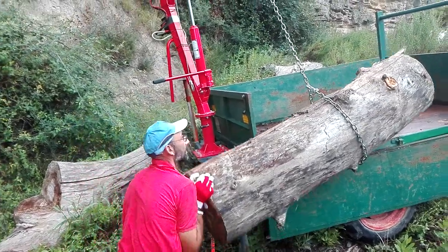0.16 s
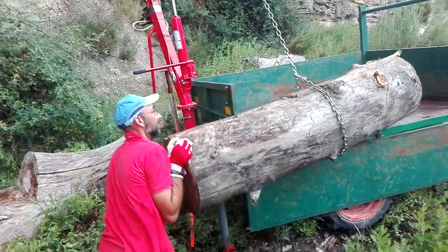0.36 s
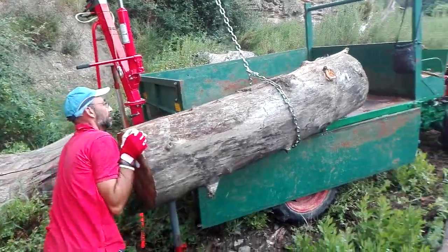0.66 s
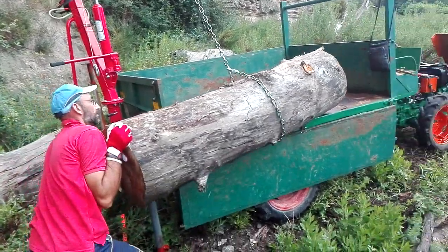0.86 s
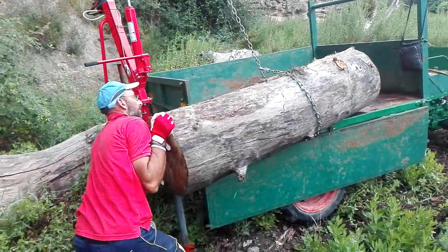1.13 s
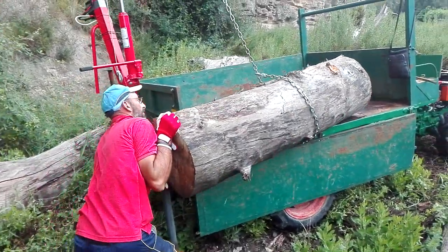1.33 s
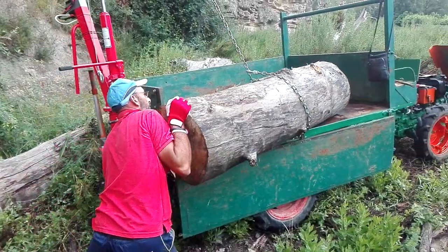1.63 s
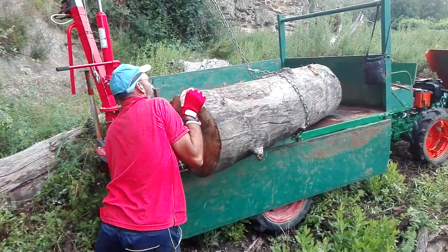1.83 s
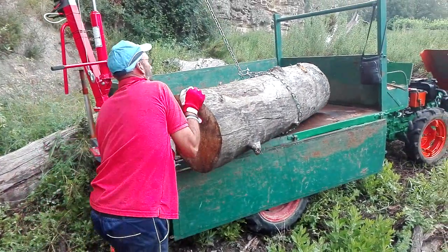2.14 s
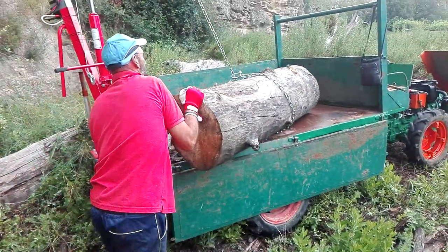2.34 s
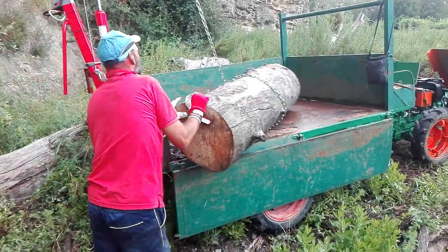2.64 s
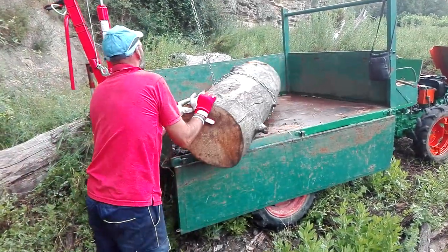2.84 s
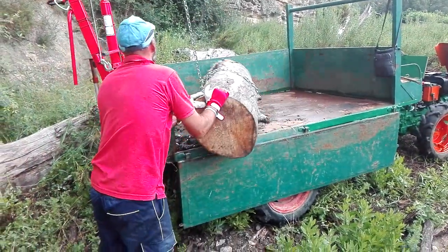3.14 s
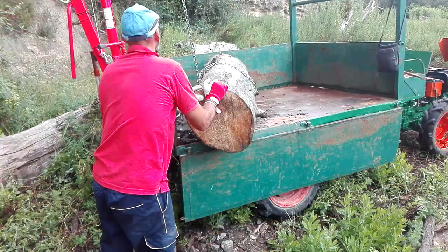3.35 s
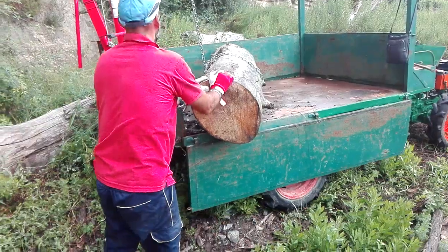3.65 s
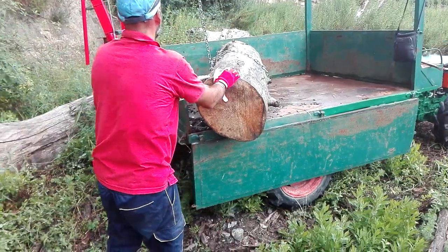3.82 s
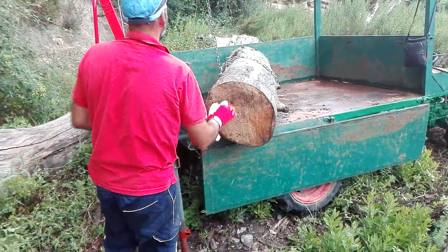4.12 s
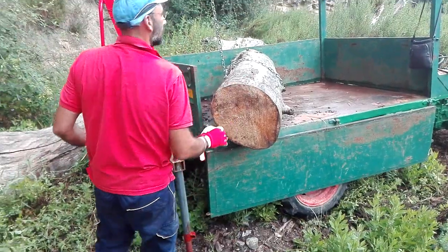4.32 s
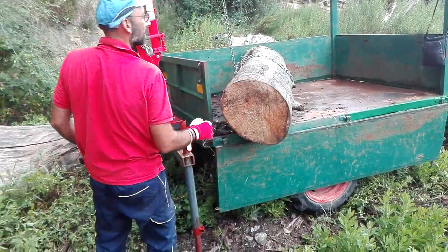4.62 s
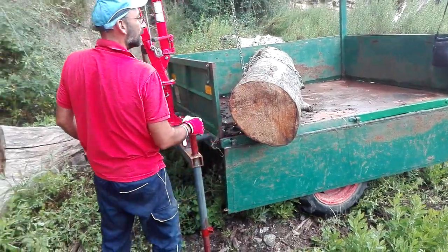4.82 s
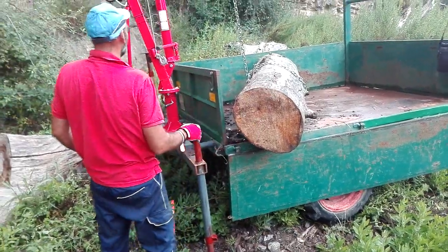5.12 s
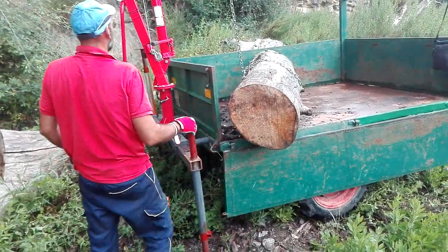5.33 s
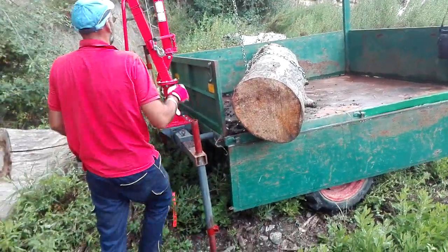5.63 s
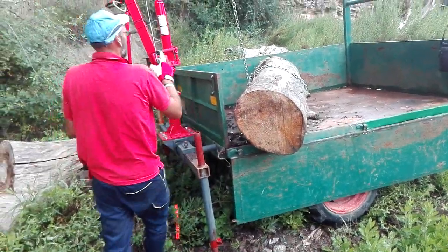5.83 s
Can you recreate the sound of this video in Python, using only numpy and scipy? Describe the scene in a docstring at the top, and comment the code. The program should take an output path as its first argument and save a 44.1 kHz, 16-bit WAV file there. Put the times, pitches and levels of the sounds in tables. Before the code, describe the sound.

Outdoors, bark grinds and judders along a metal trailer side, chain links grating, before one hard hollow steel knock and near quiet.

```python
"""Outdoors, beside a steel trailer: a log hanging from a crane chain is pushed over its side.
It rumbles, scrapes and judders along the edge while the chain shifts, rests, then drops with a loud knock,
a short rough swell just before it. Weeds rustle, twigs snap underfoot, the hoist clunks; a thin squeak.
Bodies are decaying modes and dense coloured noise, excited by bursts or streams of tiny contacts;
weeds are coloured grains, air is coloured noise, the squeak is a gliding sine with hiss."""
import sys
import numpy as np
from scipy import signal
from scipy.fft import rfft, irfft
from scipy.io import wavfile
from scipy.ndimage import uniform_filter1d

SR = 44100
rng = np.random.default_rng(int(sys.argv[2]) if len(sys.argv) > 2 else 0)


def waveform_to_disk(signal):
    """Save audio, clipped to [-1, 1], as 16-bit WAV at the path in sys.argv[1]."""
    frames = np.transpose(np.atleast_2d(signal))
    scaled = np.clip(frames, -1, 1) * 32767
    samples = np.round(scaled).astype(np.int16)
    wavfile.write(sys.argv[1], SR, samples)


N = 263277
TIME = np.arange(N) / SR


def from_db(db):
    """Decibels to amplitude gain."""
    return np.exp(np.asarray(db) * (np.log(10) / 20))


def rms_one(x):
    """Scale to unit rms."""
    return x / np.sqrt(np.mean(x ** 2) + 1e-20)


def at_hz(points, hz):
    """Interpolate a table on a log-frequency axis."""
    known_hz, values = np.transpose(points)
    return np.interp(np.log(hz + 1e-9), np.log(known_hz), values)


def coloured(x, colour):
    """Filter by a spectrum table; rms 1."""
    gain = from_db(at_hz(colour, np.fft.rfftfreq(len(x), 1 / SR)))
    return rms_one(irfft(rfft(x) * gain, len(x)))


def band(x, edges_hz):
    """Causal band-pass."""
    sos = signal.butter(4, edges_hz, "band", fs=SR, output="sos")
    return signal.sosfilt(sos, x + 1e-18)


def add(out, t_s, sound):
    """Mix a sound into out, in place, at t_s."""
    at = max(round(t_s * SR), 0)
    out[at:at + len(sound)] += sound[:max(N - at, 0)]


def drift(per_s):
    """Slow random curve, spread near 1."""
    return np.interp(TIME * per_s, np.arange(5000), rng.standard_normal(5000))


def grains(per_s, spread_db, count=N):
    """Tiny contacts at random moments, of uneven size and random sign."""
    size_db = spread_db * np.minimum(rng.exponential(1, count), 4)
    sizes = from_db(size_db) * rng.choice([-1, 1], count)
    return sizes * (rng.random(count) < per_s / SR)


def swells(rows, attack_s, fade_db_per_s):
    """Gain from rows of t/s, level/dB, hold/s: rise, hold, fade; overlaps add in power."""
    power = 0
    for t_s, db, hold_s in rows:
        rise = np.clip((TIME - t_s) / attack_s, 0, 1)
        fade_db = np.clip(fade_db_per_s * (TIME - t_s - attack_s - hold_s), 0, 200)
        power = power + (rise * from_db(db - fade_db)) ** 2
    return np.sqrt(power)


def dense_ring(colour, decay, crack_db, crack_t60_s):
    """1 s of a struck body's crowded modes: short crack plus a tail dying octave by octave."""
    t, hz = TIME[:SR], np.fft.rfftfreq(SR, 1 / SR)
    spectrum = rfft(coloured(rng.standard_normal(SR), colour))
    out = 0
    for centre_hz in 30 * 2. ** np.arange(10):
        share = np.clip(1 - abs(np.log2((hz + 1e-9) / centre_hz)), 0, 1)
        tail = from_db(-60 * t / at_hz(decay, centre_hz))
        crack = from_db(crack_db - 60 * t / crack_t60_s)
        out = out + irfft(spectrum * share, SR) * rms_one(tail + crack)
    return rms_one(out)


# upper limit on modal ring time: f/Hz, t60/s
LONGEST_RING = [(130, 1.0), (400, .6), (1000, .42), (2000, .36), (4000, .24), (10000, .15)]


def modal_ring(modes):
    """1 s of a body's strong modes, decaying sines of random sign; rms 1."""
    t, out = TIME[:SR], 0
    for hz, db, t60_s in modes:
        t60_s = min(t60_s, at_hz(LONGEST_RING, hz))
        decay = from_db(db - 60 * t / t60_s)
        out = out + rng.choice([-1, 1]) * decay * np.sin(2 * np.pi * hz * t)
    return rms_one(out)


def contact(length_s, swell):
    """Burst of tiny contacts around a main click; returns force and click time/s."""
    lead = round(4 * length_s * swell * SR) + 1
    t = (np.arange(SR // 4) - lead) / SR
    slope_s = np.where(t < 0, length_s * swell + 1e-6, length_s)
    force = rms_one(grains(3000, 4.8, count=len(t))) * np.exp(-abs(t) / slope_s)
    force[lead] += 8 * (1 - swell)   # more swell, less click
    return force, lead / SR


# register limits, low to high: lower f/Hz, upper f/Hz
BANDS = [(22, 520), (780, 2300), (2300, 6500), (6500, 18000)]


def strike(out, t_s, response, levels_db, length_s, swell):
    """Return out plus one contact on a body, each register set to its own level."""
    force, lead_s = contact(length_s, swell)
    sound, out = signal.fftconvolve(force, response)[:SR], out.copy()
    for edges_hz, db in zip(BANDS[-len(levels_db):], levels_db):
        part = band(sound, edges_hz)
        loudest = np.sqrt(uniform_filter1d(part ** 2, size=1000).max())
        add(out, t_s - lead_s, from_db(db) * part / loudest)
    return out


REFERENCE_DB = -40


def registers(law, force_db):
    """Level/dB of each register: growth with force differs, so force alters brightness."""
    return [db + growth * (force_db - REFERENCE_DB) for db, growth in law]


# bark dragged over the steel edge: t/s, force/dB
FRICTION = [(1.16, -88), (1.42, -71.5), (1.59, -69), (1.8, -65), (2.01, -58.5), (2.11, -47.5), (2.6, -44.5),
            (2.77, -39.5), (3.1, -39.5), (3.25, -34.5), (3.31, -29.5), (3.39, -79), (3.56, -98)]


def dragged(law):
    """Gain of each register during the drag; silent before and after."""
    t_s, force_db = np.transpose(FRICTION)
    moving = ((TIME >= t_s[0]) & (TIME <= t_s[-1])) * 1.
    moving = uniform_filter1d(moving, size=1800)
    return [moving * from_db(db) for db in registers(law, np.interp(TIME, t_s, force_db))]


# air spectrum: f/Hz, relative level/dB
AIR_COLOUR = [(15, -26.5), (25, -7.5), (65, 2), (90, -12), (124, -2.5), (275, -15), (314, -4.5),
              (349, -15.5), (493, -19), (959, -19), (1470, -13.5), (2020, -21), (3730, -19), (14500, -27.5)]
AIR_DB = -71


def air():
    """Still outdoor air: steady coloured noise."""
    return from_db(AIR_DB) * coloured(rng.standard_normal(N), AIR_COLOUR)


# legs brush through weeds: t/s, relative level/dB, hold/s
BRUSHES = [(0, -61.5, 0.68), (.39, -52.5, 0.42), (.9, -57.5, 0.18), (1.08, -55, 0.012), (4.45, -67.5, 0.18),
           (5.59, -67.5, 0.071), (5.86, -67.5, 0.1)]
BRUSH_ATTACK_S, BRUSH_FADE_DB_PER_S = 0.013, 124
# spectrum of leaves and twigs: f/Hz, relative level/dB
RUSTLE_COLOUR = [(700, -3), (1400, -1), (2000, -5.5), (3200, 0), (5000, 3), (7500, -3.5), (10000, -8),
                 (14000, -15)]


def weeds():
    """Leaves and stalks crackle softly: clumped grains, swelling at each brush."""
    leaves = coloured(grains(3000, 1.7) * from_db(4.3 * drift(55)), RUSTLE_COLOUR)
    return from_db(-4.0) * leaves * swells(BRUSHES, BRUSH_ATTACK_S, BRUSH_FADE_DB_PER_S)


# twigs and bark snap: t/s, force/dB, length/s
SNAPS = [(.139, -47.5, .0005), (0.305, -59.5, .0005), (.454, -48, .001), (0.472, -46, .001),
         (0.78, -51.5, .001), (0.928, -58.5, .004), (1.102, -47.5, .005), (1.135, -57, .001),
         (2.21, -36, .001), (3.359, -42, .002), (3.374, -38, .004), (3.389, -28, .004), (3.949, -65, .002),
         (4.536, -59, .001), (4.569, -63, .002), (5.639, -67.5, .005)]
# body, crack, top: level/dB at REFERENCE_DB, growth/(dB/dB)
SNAP_LAW = [(-51.5, .9), (-42.5, 0.92), (-47.5, 1)]
# twig ring time: f/Hz, t60/s
TWIG_DECAY = [(1000, 0.35), (13000, 0.15)]


def snaps():
    """Dry twigs and bark break with a click and brief splintering."""
    out = np.zeros(N)
    twig = dense_ring(RUSTLE_COLOUR, TWIG_DECAY, crack_db=17, crack_t60_s=.008)
    for t_s, force_db, length_s in SNAPS:
        out = strike(out, t_s, twig, registers(SNAP_LAW, force_db), length_s, swell=0.33)
    return out


# thin squeak: t/s, f/Hz, level/dB
SQUEAK = [(5.85, 4200, -90), (5.88, 4300, -75), (5.91, 4470, -67), (5.95, 4480, -63), (5.97, 4430, -65)]


def squeak():
    """Faint, rough rising note, jittered in pitch and level, with hiss above it."""
    t_s, hz, db = np.transpose(SQUEAK)
    pitch_hz = np.interp(TIME, t_s, hz) + 150 * drift(700)
    note = from_db(6.4 * drift(200)) * np.sin(2 * np.pi * np.cumsum(pitch_hz) / SR)
    hiss = from_db(0.5) * rms_one(band(grains(4700, 5.4), (5000, 7500)))
    return from_db(np.interp(TIME, t_s, db, left=-200)) * (note + hiss)


# hoist clunks as its load shifts: t/s, force/dB, length/s
CLUNKS = [(.046, -51.5, .014), (.379, -52.5, .008), (0.51, -36.5, 0.0027), (0.549, -52.5, 0.0089),
          (0.616, -48.5, 0.0021), (1.379, -56.5, 0.0027), (1.47, -55, 0.0097), (3.646, -48.5, 0.013)]
# boom, clang, rasp, hiss: level/dB at REFERENCE_DB, growth/(dB/dB)
CLUNK_LAW = [(-40.5, 0.78), (-42.5, 0.76), (-50.5, 2.1), (-101.5, 1.05)]
# hoist arm modes: f/Hz, relative level/dB, t60/s before the LONGEST_RING limit
HOIST_MODES = [(1240, -7, 0.32), (1593, -2.5, 0.16), (1927, -6.5, 0.18), (2370, -14, 0.096),
               (3230, -11.5, 0.34)]
# struck steel spectrum, arm and trailer: f/Hz, relative level/dB
KNOCK_COLOUR = [(30, -13.5), (80, -6.5), (130, -0.5), (200, -0.5), (255, -10), (340, -3), (480, -15.5),
                (680, -15), (950, -11), (1400, -7), (2200, -19.5), (5400, -24), (6300, -32.5), (9500, -24),
                (11500, -38)]
# ring time of steel's crowded weaker modes: f/Hz, t60/s
STEEL_DECAY = [(50, 1), (150, .75), (350, 0.43), (1000, 0.4), (2500, 0.18), (5000, 0.36), (9000, 0.22),
               (13000, 0.098)]


def clunks():
    """The hoist's arm jerks: a dull clunk, boom and clang about equal, with little treble."""
    out = np.zeros(N)
    steel = dense_ring(KNOCK_COLOUR, STEEL_DECAY, crack_db=6.5, crack_t60_s=0.19)
    steel = steel + from_db(-12.5) * modal_ring(HOIST_MODES)
    for t_s, force_db, length_s in CLUNKS:
        out = strike(out, t_s, steel, registers(CLUNK_LAW, force_db), length_s, swell=.1)
    return out


# chain links shift: t/s, force/dB, length/s
CLINKS = [(1.418, -52, 0.0067), (1.548, -43.5, .013), (1.965, -42, 0.0057), (2.057, -43, 0.0035),
          (2.085, -27.5, .0065), (2.101, -25, 0.0067), (2.134, -32, 0.0067), (2.216, -32.5, .008),
          (2.244, -39, .007), (3.54, -63.5, 0.012)]
# clang, ring, top: level/dB at REFERENCE_DB, growth/(dB/dB)
CLINK_LAW = [(-49, 0.88), (-40, 0.97), (-67, 2.32)]
# chain modes: f/Hz, relative level/dB, t60/s before load damping
CHAIN_MODES = [(2948, 16, 0.21), (2930, -18.5, 0.42), (3640, 26, 1), (3570, 17, 0.35), (3670, 3, 0.19),
               (4490, -27.5, 0.41), (5066, 8, 0.14), (5109, -16, 0.23), (4990, -29.5, 0.92),
               (8400, -2.5, 0.092), (9050, 12.5, 0.34), (9300, -6, 0.14), (9975, -15, 0.56)]
# chain spectrum: f/Hz, relative level/dB
CHAIN_COLOUR = [(650, -11.5), (1100, 1.5), (2200, -6.5), (3200, -7), (3850, 12), (4400, -4), (5100, 3.5),
                (6300, -18.5), (8300, -1.5), (14000, -19.5)]
# ring time of the chain's weaker modes: f/Hz, t60/s
CHAIN_DECAY = [(1000, 0.12), (4000, 0.13), (13000, 0.1)]
LOADED_T60_S = .13


def chain():
    """Taut links grate over each other; the load damps their ring."""
    out = np.zeros(N)
    damped = [(hz, db, min(t60_s, LOADED_T60_S)) for hz, db, t60_s in CHAIN_MODES]
    for t_s, force_db, length_s in CLINKS:
        links = dense_ring(CHAIN_COLOUR, CHAIN_DECAY, crack_db=-3, crack_t60_s=0.035)
        links = links + from_db(-15.5) * modal_ring(damped)
        out = strike(out, t_s, links, registers(CLINK_LAW, force_db), length_s, swell=0.69)
    return out


# single steel parts left ringing: t/s, f/Hz, level/dB, t60/s
PINGS = [(0.057, 1874, -44.5, 0.13), (0.378, 1715, -44.5, 0.16), (0.389, 5120, -53, 0.38),
         (0.511, 1670, -36, 0.1), (0.919, 1568, -53, 0.52), (2.1, 9000, -40.5, .16), (2.1, 9870, -40, 0.33),
         (2.754, 10150, -40.5, 0.26), (3.529, 3900, -54, 0.062), (3.643, 2020, -47, 0.15),
         (3.67, 5220, -56.5, 0.048), (4.102, 1400, -35, .78)]


def pings():
    """Lightly touched steel rings on one mode, beating faintly against a weak neighbour."""
    out, t = np.zeros(N), TIME[:SR]
    for t_s, hz, db, t60_s in PINGS:
        pair = np.sin(2 * np.pi * hz * t) + .2 * np.sin(2 * np.pi * (hz + 23) * t)
        add(out, t_s, from_db(db - 60 * t / t60_s) * pair)
    return out


# short rough swell just before the loud knock: t/s, level/dB, hold/s
PRE_KNOCK = [(4.01, -64.5, .025), (4.04, -46, .045)]
PRE_KNOCK_ATTACK_S, PRE_KNOCK_FADE_DB_PER_S = 0.0065, 1200.5
# its resonances: f/Hz, relative level/dB, t60/s before extra damping
PRE_KNOCK_MODES = [(234, -2, 0.068), (389.2, 1, 0.054), (480, -8, .07), (1350, 4.5, 0.13),
                   (1690, -2.5, 0.092), (1950, -2.5, .09), (2600, -7.5, .08), (3020, -4.5, .08),
                   (3530, -7.5, .09), (4250, -6, .06)]


def pre_knock_swell():
    """Dense small clicks ring a few well-damped resonances."""
    body = modal_ring(PRE_KNOCK_MODES) * from_db(-60 * TIME[:SR] / .04)   # extra damping
    rough = rms_one(signal.fftconvolve(grains(720, 1.5), body)[:N])
    return swells(PRE_KNOCK, PRE_KNOCK_ATTACK_S, PRE_KNOCK_FADE_DB_PER_S) * rough


# bed rumble spectrum: f/Hz, relative level/dB
RUMBLE_COLOUR = [(15, -37.5), (25, -18), (59, 2.5), (78, 9), (124, -20.5), (171, -11.5), (202, -2.5),
                 (264, -10), (384, -10), (418, -12.5), (560, -21), (662, -31.5), (700, -38), (910, -43),
                 (1540, -120)]
# trailer bed modes: f/Hz, relative level/dB, t60/s before the LONGEST_RING limit
BED_MODES = [(130.3, -0.5, 0.92), (206, 0.5, 0.69), (311, -7, 1), (361.7, -1.5, 0.64), (399, -5, 0.78)]


def jolts(edges_hz):
    """Lumps of the log jolt the bed at random, at three points of contact; evened to rms 1."""
    shaking = 0
    for point in range(3):
        bed = dense_ring(RUMBLE_COLOUR, STEEL_DECAY, crack_db=10.5, crack_t60_s=0.16)
        bed = bed + from_db(-19.5) * modal_ring(BED_MODES)
        lumps = grains(300, 2.6, count=N + SR - 1)
        shaking = shaking + signal.fftconvolve(lumps, bed, "valid")
    shaking = band(shaking, edges_hz)
    return shaking / np.sqrt(uniform_filter1d(shaking ** 2, size=4000))


# log's weight leans on the trailer: t/s, relative sway level/dB, relative rumble level/dB, hold/s
SHOVES = [(0, -45.5, -52.5, .17), (0.369, -37.5, -43, 0.22), (.68, -40.5, -71, 0.057),
          (0.885, -46.5, -59.5, 0.063), (1.166, -45, -48, 0.5), (1.567, -41, -44, 0.026),
          (2.053, -42.5, -44.5, .16), (2.36, -62.5, -44, 0.11), (3.0, -35.5, -37.5, 0.083),
          (3.257, -35.5, -37, 0.039), (4.001, -58.5, -49, .06), (4.27, -46, -41.5, 0.043),
          (4.415, -50.5, -59, 0.049)]
SHOVE_ATTACK_S, SHOVE_FADE_DB_PER_S = 0.0067, 75.5
# sway, bed rumble under the drag: relative level/dB at REFERENCE_DB, growth/(dB/dB)
SHAKE_LAW = [(-52.5, 0.069), (-40.5, 0.34)]


def rumble():
    """The trailer sways deeply and its bed rumbles, under the drag and at each shove."""
    drag_sway, drag_bed = dragged(SHAKE_LAW)
    sway_rows = [(t_s, db, hold_s) for t_s, db, _, hold_s in SHOVES]
    bed_rows = [(t_s, db, hold_s) for t_s, _, db, hold_s in SHOVES]
    sway = np.hypot(swells(sway_rows, SHOVE_ATTACK_S, SHOVE_FADE_DB_PER_S), drag_sway)
    bed = np.hypot(swells(bed_rows, SHOVE_ATTACK_S, SHOVE_FADE_DB_PER_S), drag_bed)
    return from_db(-1.5) * (sway * jolts((22, 110)) + bed * jolts((110, 600)))


# scraped steel spectrum: f/Hz, relative level/dB
SLIDE_COLOUR = [(450, 3.5), (680, -6), (900, 1), (1200, 1), (1900, -7), (2600, -2.5), (3600, -4),
                (4700, -1), (5050, 3.5), (5280, 0.5), (5800, -7), (7500, -12), (10000, -15.5), (14000, -22)]
# side panel modes: f/Hz, relative level/dB, t60/s before the LONGEST_RING limit
PANEL_MODES = [(787, -3, .42), (926, -8.5, 0.35), (986, -2.5, 0.54), (1038, -2, 1), (1250, -7.5, 0.22),
               (1355, 2, 1), (1490, -5.5, 0.17), (1540, -11.5, 0.13), (1730, -6, 0.12), (2005, -1, 0.29),
               (2310, -9.5, 0.61), (2780, -9.5, 0.19), (3117, -7, 0.082), (3300, -7.5, .28),
               (3510, -5.5, 0.22), (4740, -7.5, 0.25), (5052, 3, 0.12), (5340, -13, 0.48),
               (5340, -16.5, 0.077)]
# grind, rasp, hiss: lower f/Hz, upper f/Hz
SLIDE_BANDS = [(760, 1700), (1700, 6500), (6500, 18000)]
# grind, rasp, hiss: level/dB at REFERENCE_DB, growth/(dB/dB)
SLIDE_LAW = [(-46.5, 0.37), (-40.5, 0.85), (-49.5, 0.93)]
SLIDE_WANDER_DB, SLIDE_WANDER_PER_S = 0, 14   # 0 dB: no random colour change


def slide():
    """Bark fibres catch on the steel edge in clumps, at three points of contact that take turns."""
    scrape = 0
    for point in range(3):
        steel = dense_ring(SLIDE_COLOUR, STEEL_DECAY, crack_db=12.5, crack_t60_s=0.027)
        steel = steel + from_db(-23.0) * modal_ring(PANEL_MODES)
        friction = grains(800, 3.4) * from_db(4 * drift(14) + 2.5 * drift(80))
        scrape = scrape + signal.fftconvolve(friction, steel)[:N]
    scrape = scrape / np.sqrt(uniform_filter1d(scrape ** 2, size=4000))   # points share one load
    out = np.zeros(N)
    for gain, edges_hz in zip(dragged(SLIDE_LAW), SLIDE_BANDS):
        wander = from_db(SLIDE_WANDER_DB * drift(SLIDE_WANDER_PER_S))
        out = out + gain * wander * rms_one(band(scrape, edges_hz))
    return out


# bark sticks and slips: t/s, force/dB, length/s
SLIPS = [(1.797, -54, 0.0021), (1.842, -52.5, 0.0073), (1.876, -43, 0.011), (1.901, -35, .0008),
         (1.91, -35.5, 0.0053), (2.301, -40, 0.0028), (2.343, -48, 0.0078), (2.627, -41.5, 0.0045),
         (2.852, -34.5, 0.011), (2.896, -34.5, 0.0032), (2.944, -26.5, .006), (2.958, -21.5, .003),
         (2.983, -34, .006), (3.027, -36.5, 0.0053), (3.185, -32, 0.0069), (3.275, -36, 0.0093),
         (3.318, -28.5, 0.0069)]
# grind, rasp, hiss: level/dB at REFERENCE_DB, growth/(dB/dB)
SLIP_LAW = [(-45, 0.63), (-40, 0.98), (-59, 1.15)]


def slips():
    """Bark catches on the edge and lets go in a swelling burst."""
    out = np.zeros(N)
    steel = dense_ring(SLIDE_COLOUR, STEEL_DECAY, crack_db=13.5, crack_t60_s=0.036)
    steel = steel + from_db(-14.5) * modal_ring(PANEL_MODES)
    for t_s, force_db, length_s in SLIPS:
        out = strike(out, t_s, steel, registers(SLIP_LAW, force_db), length_s, swell=.9)
    return out


# knocks on the trailer, the last a faint low thump like a footstep: t/s, force/dB, chatter length/s
KNOCKS = [(0.374, -51.5, 0.0099), (.492, -46.5, 0.0081), (1.903, -41.5, 0.0074), (3.316, -31, 0.011),
          (4.095, -25, 0.0075), (4.102, -22.5, 0.0096), (4.138, -31, 0.0069), (4.28, -43.5, 0.0097),
          (4.423, -46.5, 0.009), (5.879, -71.5, 0.0067)]
# boom, clang, rasp, hiss: level/dB at REFERENCE_DB, growth/(dB/dB)
KNOCK_LAW = [(-35, .9), (-41.5, 1.08), (-42, 1.05), (-53.5, 1.37)]


def knocks():
    """Knocks on the trailer: bed modes boom, panel modes clang; the last is a faint low thump."""
    out = np.zeros(N)
    for t_s, force_db, chatter_s in KNOCKS:
        strong = from_db(-11.5) * modal_ring(BED_MODES) + from_db(-14.0) * modal_ring(PANEL_MODES)
        steel = dense_ring(KNOCK_COLOUR, STEEL_DECAY, crack_db=-1, crack_t60_s=0.068) + strong
        out = strike(out, t_s, steel, registers(KNOCK_LAW, force_db), chatter_s, swell=.05)
    return out


def two_ports(x, scattered):
    """Close-set microphone ports share the bass; treble noise tracking scattered splits them."""
    side = 0
    for edges_hz, share_db in [((4300, 6000), -6), ((6000, 9000), 0), ((9000, 15000), -1)]:
        level = np.sqrt(abs(uniform_filter1d(band(scattered, edges_hz) ** 2, size=100)))
        noise = rms_one(band(rng.standard_normal(N), edges_hz))
        side = side + from_db(share_db) * level * noise
    return np.array([x + side, x - side])


# feed to the scattered treble, relative to each source
AIR_SCATTER_DB, WEED_SCATTER_DB, CHAIN_SCATTER_DB = -5.5, -15, -28
SCRAPE_SCATTER_DB, KNOCK_SCATTER_DB = -15.5, -7.5


def scene():
    """Log, chain and weeds over still outdoor air."""
    still_air = air()
    sources = [(knocks() + clunks() + rumble() + pre_knock_swell(), KNOCK_SCATTER_DB),
               (slide() + slips(), SCRAPE_SCATTER_DB),
               (chain() + pings(), CHAIN_SCATTER_DB),
               (snaps() + weeds(), WEED_SCATTER_DB),
               (squeak() + still_air, AIR_SCATTER_DB)]
    mix = sum(x for x, _ in sources)
    scattered = sum(from_db(db) * x for x, db in sources)
    return two_ports(mix, scattered)


CUTOFF_HZ = 14350


def record(dry):
    """Steep elliptic low-pass: 0.2 dB ripple, 80 dB stop band."""
    return signal.sosfilt(signal.ellip(10, .2, 80, CUTOFF_HZ, fs=SR, output="sos"), dry)


dry = scene()
out = record(dry)
waveform_to_disk(out)
```